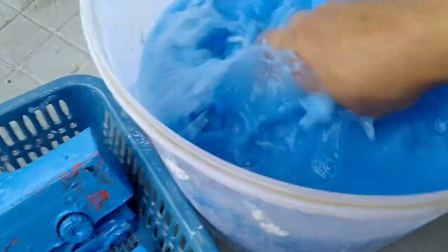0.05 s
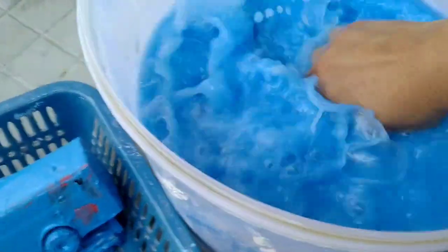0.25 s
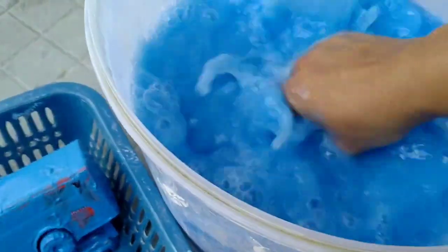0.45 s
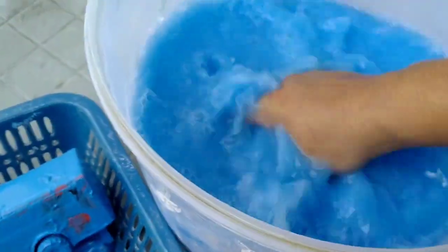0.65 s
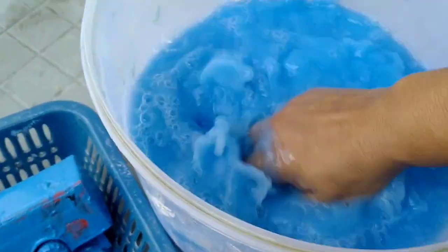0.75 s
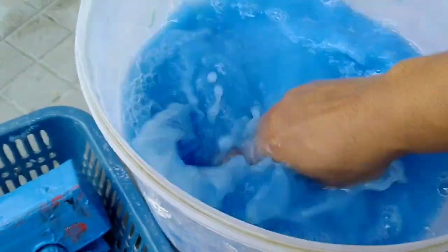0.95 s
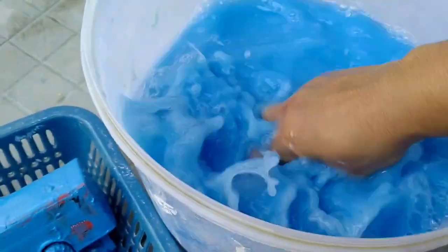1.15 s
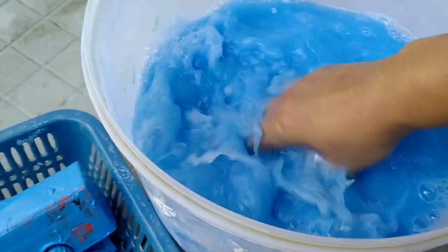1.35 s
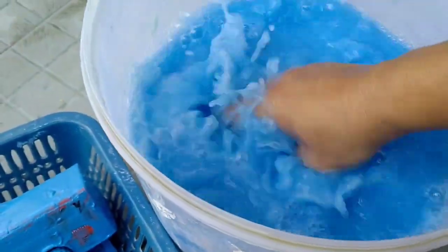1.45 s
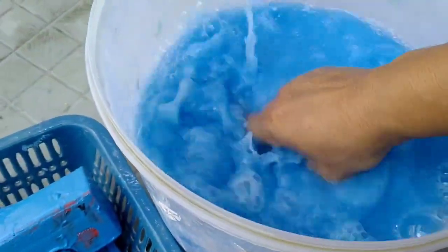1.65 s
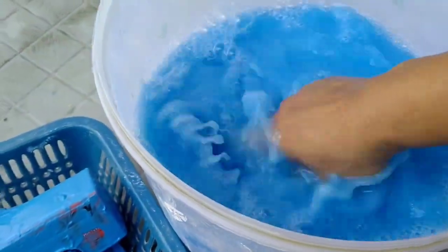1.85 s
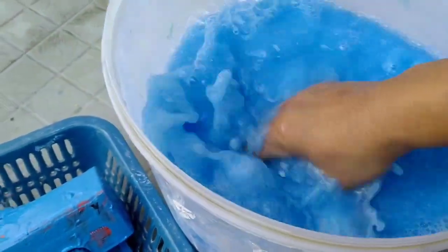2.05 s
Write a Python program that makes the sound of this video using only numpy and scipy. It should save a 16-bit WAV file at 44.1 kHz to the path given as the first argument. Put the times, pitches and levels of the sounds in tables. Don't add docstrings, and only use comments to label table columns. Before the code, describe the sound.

A hand stirs soapy water in a plastic bucket, close to a phone microphone: ticking drops, a burst of splashes and a gulp, a quieter spell, one hard splash, more stirring, another gulp, then settling.

```python
import sys
import numpy as np
from scipy import signal
from scipy.fft import rfft, irfft
from scipy.io import wavfile
from scipy.ndimage import uniform_filter1d

SR = 44100
rng = np.random.default_rng(int(sys.argv[2]) if len(sys.argv) > 2 else 0)


def pcm_store(signal):
    levels = np.round(np.clip(np.atleast_2d(signal), -1, 1) * 32767)
    wavfile.write(sys.argv[1], SR, levels.astype(np.int16).T)


def decibels_to_gain(level_db):
    exponent = np.asarray(level_db, float) / 20
    return 10 ** exponent


N = 92610

# peak_s, level_db, brightness_db
SPRAY_HITS = [(0.136, -11.5, -20), (0.149, 0.5, 7), (0.25, -5.5, -13), (0.278, -1, 22), (0.286, 4.5, 24),
              (0.296, -1, 26), (0.358, 1, 29), (0.426, -16.5, -28), (0.493, -4.5, 1), (0.634, -2.5, 19),
              (0.879, -9.5, -2), (1.105, -10.5, 11), (1.145, -10.5, -3), (1.166, -5, 20),
              (1.185, -16.5, -9), (1.201, -14, 1), (1.275, -21.5, -11), (1.416, -2.5, 43), (1.502, -13, 13),
              (1.653, -5.5, 16), (1.694, -5.5, -10), (1.766, -4.5, 11.5), (1.833, -18, -21),
              (1.951, -12.5, 9), (2.094, -19.5, -7)]


def evened(x):
    return x / np.sqrt(np.mean(x ** 2) + 1e-20)


def coloured(x, points):
    f, db = np.transpose(points)
    hz = np.fft.rfftfreq(len(x), 1 / SR)
    gain_db = np.interp(np.log(hz + 1), np.log(f + 1), db)
    return irfft(rfft(x) * decibels_to_gain(gain_db), len(x))


def flattened(x):
    spectrum = rfft(x)
    nearby_power = uniform_filter1d(abs(spectrum) ** 2, 800)
    return irfft(spectrum / np.sqrt(nearby_power + 1e-9), N)


def add(mix, s, sound):
    part = mix[max(round(s * SR), 0):][:len(sound)]
    part += sound[:len(part)]


def listed():
    # peak_s, level_db, pitch_hz, cycles
    gulps = [
        (.4, -16, 420, 4.6),
        (1.668, -14, 432, 3.3),
    ]
    # peak_s, level_db, pitch_hz, cycles
    pockets = [(0.022, -31, 1050, 3.6), (0.176, -23.5, 700, 10), (0.233, -11, 810, 10),
               (0.259, -12.5, 687, 10), (0.294, -1.5, 870, 3.5), (0.315, -3.5, 913, 6.8),
               (0.348, -8.5, 542, 6.1), (0.358, -12, 786, 6.7), (0.379, -18.5, 780, 4.8),
               (0.465, -25, 870, 6.6), (0.633, -20.5, 950, 5.3), (0.86, -19, 947, 6.8),
               (0.892, -21, 980, 6), (1.079, -21, 960, 5.8), (1.141, -2.5, 1019, 4.6),
               (1.161, -25.5, 375, 5.56), (1.29, -26, 724, 5.1), (1.336, -15.5, 1000, 7),
               (1.378, -17.5, 900, 11), (1.442, -12.5, 895, 9), (1.484, -15.5, 578, 6.7),
               (1.581, -29, 650, 9), (1.671, -13.5, 648, 7.1), (1.709, -16, 1187, 2.9),
               (2.036, -19, 922, 10), (2.058, -19.5, 643, 8)]
    # peak_s, level_db, pitch_hz, cycles
    middling = [(0.135, -6.5, 2110, 8), (0.19, -13.5, 1990, 9), (0.282, -0.5, 2160, 9),
                (0.333, 5.5, 1613, 5.3), (0.343, -5, 2025, 10), (0.406, -11, 1540, 5.4),
                (0.478, -7, 1786, 9), (0.64, -7.5, 1825, 7.6), (0.783, -16.5, 1505, 9),
                (0.862, -14, 1490, 7.1), (0.891, -11, 1810, 4.7), (1.076, -4, 1760, 4.3),
                (1.15, -2.5, 1470, 8.3), (1.158, 1, 1510, 9), (1.16, 7.5, 2240, 3),
                (1.165, -1.5, 1740, 3.3), (1.175, -6, 1900, 8.5), (1.186, 1.5, 2020, 2.5),
                (1.234, -8, 1550, 1.95), (1.239, -4.5, 1742, 14), (1.44, -8, 1745, 9.6),
                (1.532, -17.5, 1920, 3.4), (1.578, -7, 1830, 9), (1.585, -2.5, 1944, 8),
                (1.593, -20, 1830, 12), (1.692, -6, 1954, 6.6), (1.698, -2, 2020, 6.5),
                (1.71, -16, 1940, 11), (2.036, -10, 1830, 9.4), (2.096, -11.5, 1430, 4.2)]
    # peak_s, level_db, pitch_hz
    beads = [(0.076, -13, 5900), (0.131, -5, 2820), (0.142, -7, 5900), (0.147, -8, 6020), (0.148, -6, 2630),
             (0.156, -3, 2570), (0.267, -2.5, 5200), (0.397, -6, 2970), (0.427, -6.5, 5350),
             (0.492, -6.5, 6650), (0.541, -10, 3480), (0.729, -8, 2940), (0.89, -10.5, 2530),
             (0.894, -18, 2880), (1.028, -7, 2550), (1.047, -9, 3210), (1.058, -6.5, 3270),
             (1.146, -8, 4200), (1.162, -2, 3460), (1.167, -9.5, 3000), (1.531, -5, 2220),
             (1.581, -11.5, 5130), (1.692, -4, 3500), (1.942, -12.5, 2850), (1.949, -11, 4280),
             (1.965, -14.5, 3800), (2.095, -12.5, 5530)]
    bead_cycles = 5.84
    return gulps + pockets + middling + [(*row, bead_cycles) for row in beads]


def bubble(hz, cycles, phase):
    glide = 0.005
    turns = np.arange(round(5 * cycles / hz * SR)) / SR * hz
    u = turns / cycles
    swell = (u * np.exp(1 - u)) ** 2
    bend = glide * (turns - cycles) ** 2 / 2
    return swell * np.sin(2 * np.pi * (turns + bend + phase))


def bubbles():
    ring_share, level_db, roughness = 0.55, -2.5, 0.55
    out, rows = np.zeros(N), listed()
    churn = rng.standard_normal(N)
    for (s, db, hz, cycles), phase in zip(rows, rng.random(len(rows))):
        ring = bubble(hz, ring_share * cycles, phase)
        nearby = churn[round(s * SR / 2):][:len(ring)]
        shake = evened(uniform_filter1d(nearby, round(2 * SR / hz)))
        start_s = s - ring_share * cycles / hz
        add(out, start_s, decibels_to_gain(db + level_db) * ring * (1 + roughness * shake))
    return out


def stir(axis):
    # time_s, stirring_db, foam_db, slosh_db
    strokes = np.transpose([(0, -18, -25.5, -35), (0.068, -58, -32, -39), (.2, -15, -23.5, -39.5),
                            (0.389, -6.5, -23.5, -28), (.47, -19.5, -32.5, -27), (.82, -41, -33, -38.5),
                            (1.0, -39, -28.5, -70), (1.17, -18.5, -31.5, -36), (1.45, -15, -29, -31),
                            (1.732, -11.5, -26.5, -25), (1.88, -38.5, -34, -42), (2.1, -49, -31.5, -63)])
    return decibels_to_gain(np.interp(np.arange(N) / SR, strokes[0], strokes[axis]))


def wake(rows, wake_s, lead):
    power = np.zeros(N)
    u = np.arange(round(8 * wake_s * SR)) / SR / wake_s
    for row in rows:
        add(power, row[0] - lead * wake_s, decibels_to_gain(row[1]) ** 2 * u * np.exp(1 - 2 * u))
    return np.sqrt(power)


def sparse(per_s, spread_db):
    u = rng.random((N, 3))
    happens = u[:, 0] < per_s / SR
    size = decibels_to_gain(spread_db * np.minimum(-np.log(u[:, 1]), 4))
    return happens * size * np.sign(u[:, 2] - .5)


def swarm():
    # pitch_hz, level_db
    balance = [(120, -60), (200, -29.5), (447, -5.5), (872, -3), (1170, -5), (1780, 0), (7000, -27.5),
               (9100, -15), (15400, -120)]
    births = sparse(per_s=2200, spread_db=5)
    size = rng.integers(0, 36, N)
    out = np.zeros(N)
    for k, hz in enumerate(np.geomspace(250, 7000, 36)):
        ring = bubble(hz, 3.65 * rng.uniform(0.44, 1.63), 0)
        out += signal.oaconvolve(births * (size == k), ring * hz / np.linalg.norm(ring) ** .5)[:N]
    every = evened(coloured(flattened(out), balance))
    gurgle_filter = signal.butter(2, 810, fs=SR, output="sos")
    large = signal.sosfiltfilt(gurgle_filter, every)
    splash = decibels_to_gain(-17) * wake(listed(), wake_s=0.0056, lead=0.9)
    small_level = decibels_to_gain(-9.5) * stir(axis=1) + splash
    large_level = stir(axis=3) + decibels_to_gain(-27.5) * splash
    return small_level * evened(every - large) + large_level * evened(large)


def foam():
    # pitch_hz, level_db
    balance = [(2060, 6), (3500, 7), (6320, -1.5), (8100, 5), (10900, -3), (14900, 7), (16000, 4)]
    pops = np.zeros(N)
    for hz in np.geomspace(4500, 15500, 10):
        tick = evened(bubble(hz, 7.0, 0)) * hz ** .5
        pops += signal.oaconvolve(sparse(per_s=110, spread_db=9), tick)[:N]
    drops = abs(sparse(per_s=70, spread_db=4.8))
    flicker = 1 + 1.08 * evened(signal.oaconvolve(drops, np.hanning(150), "same"))
    fizz = evened(flattened(pops)) + decibels_to_gain(1.5) * flicker * rng.standard_normal(N)
    dull = [(balance[0][0] / 2, balance[0][1] - 30)]
    level = decibels_to_gain(-1) * stir(axis=2) + decibels_to_gain(-14.5) * wake(SPRAY_HITS, wake_s=0.0077, lead=0.39)
    return level * evened(coloured(fizz, dull + balance))


def spray():
    rise_s, fall_s, level_db = 0.0018, 0.00065, -12.5
    out, t = np.zeros(N), np.arange(-200, 600) / SR
    shape = np.where(t < 0, np.exp(t / rise_s), np.exp(-t / fall_s))
    for s, db, bright_db in SPRAY_HITS:
        noise = rng.standard_normal(800)
        colour = [(1500, -26), (5000, -12), (8050, 0), (10500, bright_db / 2 - 5.5), (14600, bright_db)]
        add(out, s + t[0], decibels_to_gain(db + level_db) * evened(shape * coloured(noise, colour)))
    return out


def bucket(x):
    fade_s = 0.041
    echoes = np.zeros(6000)
    at = np.arange(40, 5960, 30) + rng.integers(0, 30, 198)
    echoes[at] = rng.choice([-1., 1.], 198) * decibels_to_gain(-60 * at / SR / fade_s)
    return x + decibels_to_gain(-6) * signal.oaconvolve(x, echoes / np.linalg.norm(echoes))[:N]


def room():
    # pitch_hz, level_db
    hum = [(15, -30), (25, 1), (78, -1), (200, -19), (1130, -11.5), (1770, 3), (2500, -7.5), (3250, -21),
           (5500, -120)]
    return decibels_to_gain(-29.5) * evened(coloured(rng.standard_normal(N), hum))


def scene():
    water = bubbles() + swarm() + foam()
    return (bucket(water) + spray() + room())[None]


def roll_off(x):
    return signal.sosfilt(signal.butter(12, 16460, fs=SR, output="sos"), x)


def record(dry):
    hot = np.clip(dry, -1, 1)
    low_pass = signal.firwin(255, 15700, fs=SR)[None]
    return roll_off(signal.oaconvolve(hot, low_pass, "same"))


dry = scene()
out = record(dry)
pcm_store(out)
```